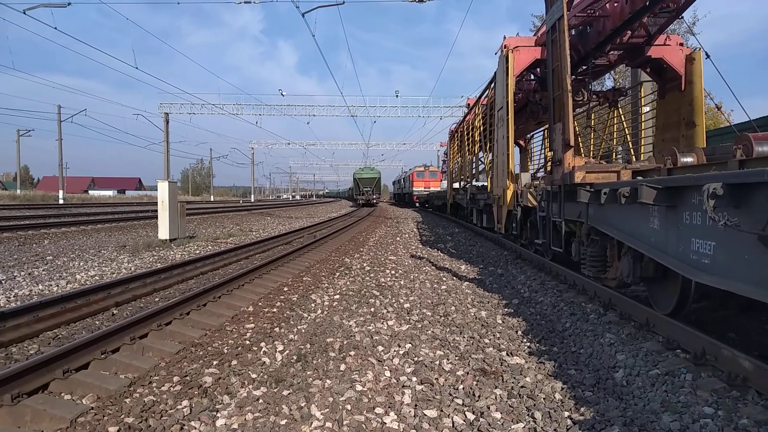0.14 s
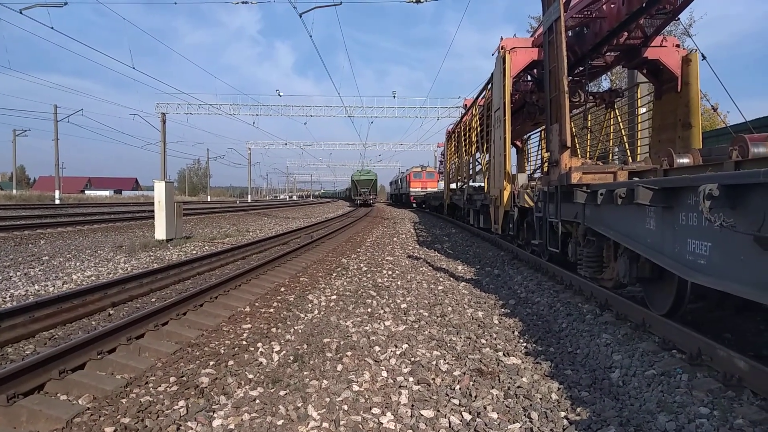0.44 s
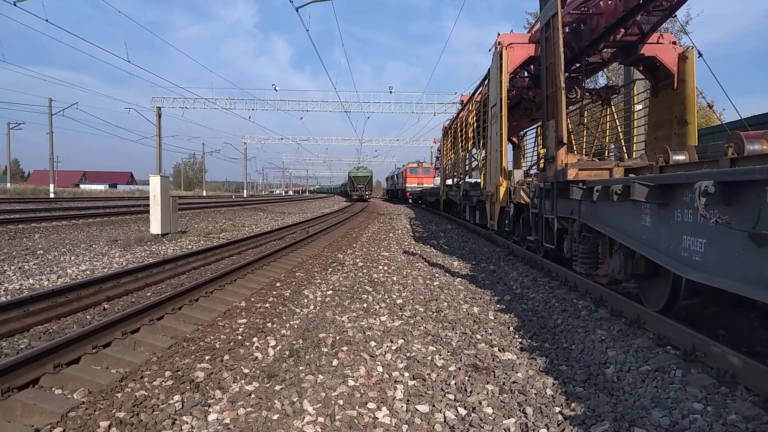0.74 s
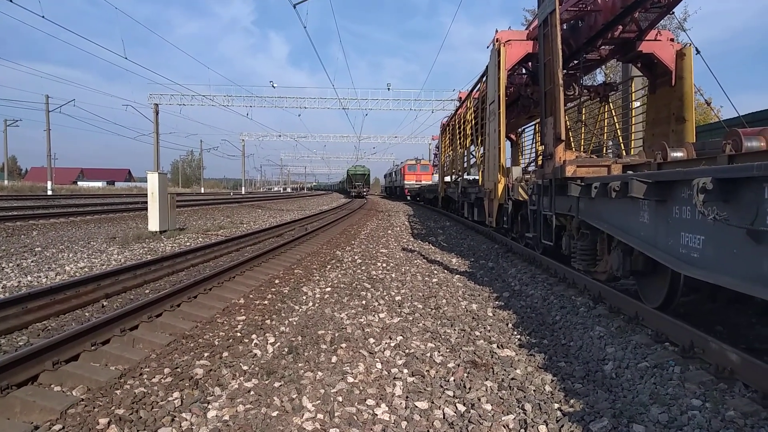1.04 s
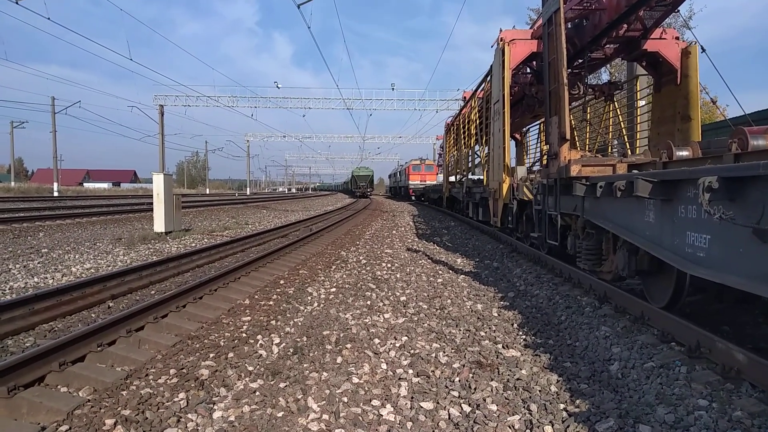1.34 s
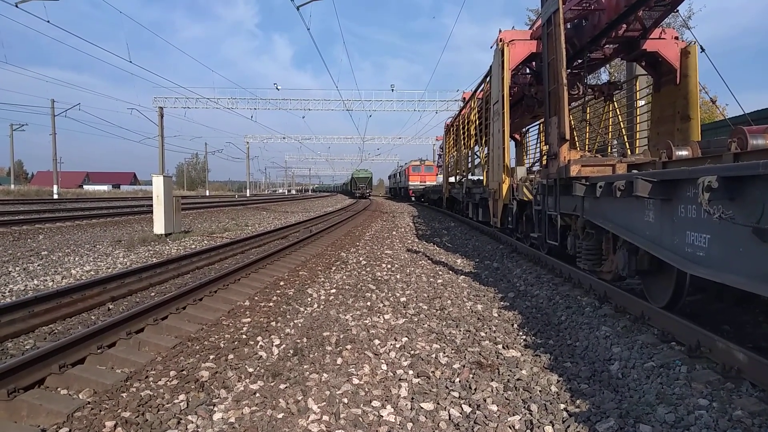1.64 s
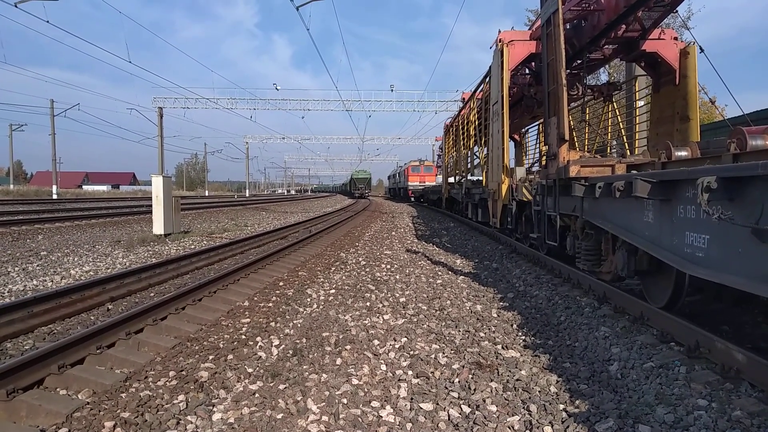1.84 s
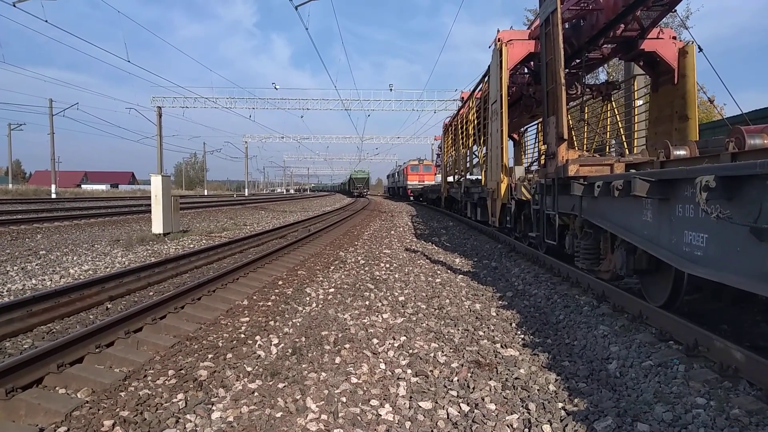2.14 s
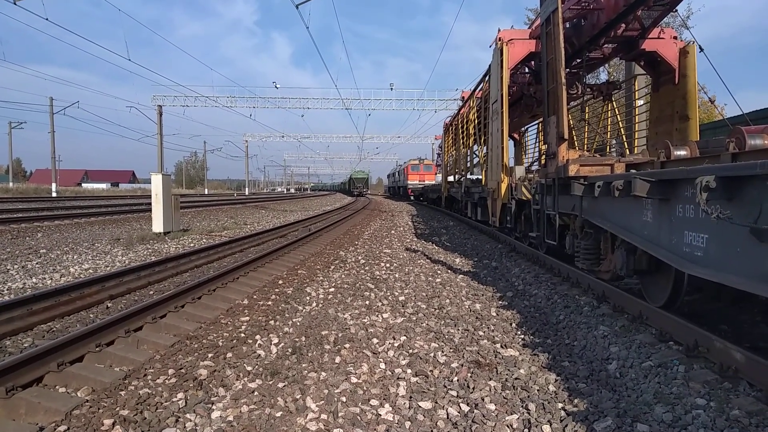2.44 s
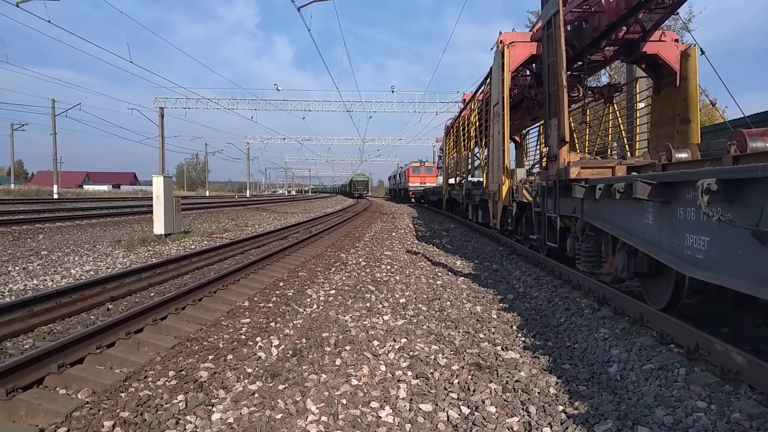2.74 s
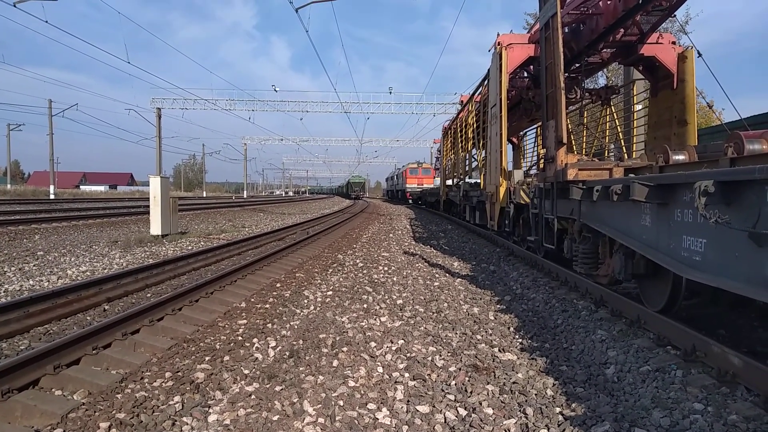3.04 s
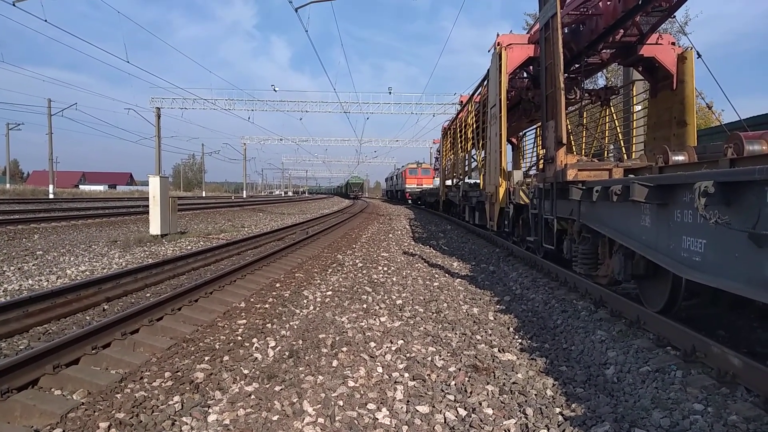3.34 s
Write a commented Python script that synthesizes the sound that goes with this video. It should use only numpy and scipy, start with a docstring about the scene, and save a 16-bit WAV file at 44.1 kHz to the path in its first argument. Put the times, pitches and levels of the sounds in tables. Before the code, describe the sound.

A freight train rolls away, slightly to the right, with rumble, rail hiss and a wheel scraping about five times a second. Loose gear knocks through the first second, with two high pings near 0.3 seconds and a short, loud creak on the left at 0.6. Wheels double-clack over a rail joint at 1.2 and 1.9 seconds. The scraping continues to 3.5 seconds as the rumble fades.

```python
"""A freight train rolls away over ballasted track, to the right of the microphone.
Wagons rumble and rails hiss from the start, and a worn wheel scrapes once a turn. Loose gear knocks,
a flange brushes the rail and rings twice, and a short stick-slip creak comes from the left.
Near 1.2 s and 1.9 s two bogies clatter over a rail joint, two axles each.
The wheel scrapes on while the rumble fades with distance."""
import sys
import numpy as np
from scipy import signal
from scipy.fft import rfft, irfft
from scipy.io import wavfile
from scipy.ndimage import uniform_filter1d

SR = 44100
rng = np.random.default_rng(int(sys.argv[2]) if len(sys.argv) > 2 else 0)


def log_audio(samples):
    """Write samples as a 16-bit WAV file to the path given in sys.argv[1]."""
    # one column per channel
    frames = np.atleast_2d(samples).T
    # limit to full scale, then quantise
    limited = np.clip(frames, -1, 1)
    pcm = np.round(limited * 32767).astype(np.int16)
    wavfile.write(sys.argv[1], SR, pcm)


N = 154350
SIDE = np.array([[.5], [-.5]])  # left, right share of a pan; positive pan_db is left


def undb(db):
    """Decibels to gain."""
    return 10 ** (np.asarray(db) / 20)


def clock():
    """Sample times in s."""
    return np.arange(N) / SR


def unit(x):
    """Scale to rms 1."""
    return x / np.sqrt(np.mean(x ** 2))


def curve(rows, column=1):
    """One table column, interpolated in time."""
    rows = np.array(rows)
    return np.interp(clock(), rows[:, 0], rows[:, column])


def freqs():
    """Bin frequencies in Hz."""
    return np.maximum(np.arange(N // 2 + 1) * SR / N, 1)


def along(points):
    """(freq_hz, value) points, interpolated in log frequency."""
    hz, value = np.array(points).T
    return np.interp(np.log(freqs()), np.log(hz), value)


def shape(points):
    """Gain of a (freq_hz, gain_db) spectrum, rolled off past its ends."""
    low_rolloff = np.minimum(freqs() / points[0][0], 1) ** 2
    high_rolloff = np.minimum(points[-1][0] / freqs(), 1) ** 5
    return undb(along(points)) * low_rolloff * high_rolloff


def resonance(hz, width_hz):
    """One resonance, gain 1 at centre."""
    f = freqs()
    return 1 / (1 + 1j * (f * f - hz * hz) / (f * width_hz))


def walk(hz):
    """Smooth random wander, rms 1."""
    step = int(SR / hz)
    held = np.repeat(rng.standard_normal(N // step + 1), step)
    return unit(uniform_filter1d(held, step)[:N])


def blow(start_s, attack_s, hold_s, decay_s, tail_db=-60, tail_s=.01):
    """Impact envelope: attack, hold, main decay plus a weaker tail."""
    t = clock() - start_s
    late_s = np.maximum(t - attack_s - hold_s, 0)
    share = undb(tail_db)
    fall = (1 - share) * np.exp(-late_s / decay_s) + share * np.exp(-late_s / tail_s)
    return np.clip(t / attack_s, 0, 1) * fall


def struck(sound, envelope):
    """Apply an envelope; the result has the envelope's rms."""
    return unit(sound * envelope) * np.sqrt(np.mean(envelope ** 2))


# Likeness of the two microphone ports: freq_hz, coherence_ratio
PORT_COHERENCE = [(60, 0.89), (400, 0.91), (900, 0.96), (2000, 0.42), (5000, 0.45), (12000, 0.2)]
# Phase between the ports: freq_hz, left_lead_rad
PORT_PHASE = [(100, -1), (400, 0.7), (800, 0.5149), (1550, 5), (1810, 8.5), (3200, 2.5), (4400, 1.07),
              (6100, 3.5), (9000, -3.5)]


def ports(pan):
    """Left and right responses to the shared and the diffuse part of a sound."""
    coherence = np.clip(along(PORT_COHERENCE), 0, 1)
    gain = undb(SIDE * along(pan))
    shared = gain * np.sqrt(coherence) * np.exp(1j * SIDE * along(PORT_PHASE))
    return shared, gain * np.sqrt(1 - coherence)


def linger(decay_s=.012, level_db=-8, corner_hz=1200):
    """Response of the dense, short-lived steel resonances after each impact."""
    tail = rng.standard_normal(N) * np.exp(-clock() / decay_s)
    tail /= np.sqrt(np.sum(tail ** 2))
    return 1 + undb(level_db) * np.minimum(freqs() / corner_hz, 1) * rfft(tail)


def contact(response, mic, grain_db=0, even_s=0.044):
    """Dense tiny impacts ring a body; stereo, levelled to rms 1."""
    shared, diffuse = mic
    force = rfft(rng.standard_normal((3, N)) * undb(grain_db * walk(1500)))
    sound = irfft(response * linger() * (shared * force[0] + diffuse * force[1:]), N)
    window = int(even_s * SR)
    power = uniform_filter1d(np.mean(sound ** 2, axis=0), window)
    return sound / np.sqrt(uniform_filter1d(power, window))


# Wheel modes: freq_hz, gain_db
WHEEL_MODES = [(1692, -21), (2266, 3), (2972, 10), (3637, -19), (4366, -19), (4630, -21), (5470, 15)]


def wheel_ring(mic, width_hz=9):
    """Rail contact rings the wheel's narrow modes."""
    return contact(sum(undb(db) * resonance(hz, width_hz) ** 2 for hz, db in WHEEL_MODES), mic)


# Rolling noise: time_s, rumble_db, hiss_db
ROLL_LEVELS = [(0, -36, -38), (.18, -34, -35.5), (.35, -29, -29), (.43, -34.5, -37.5), (.58, -32, -34),
               (.7, -32.5, -36), (.78, -38.5, -42), (.9, -33.5, -35.5), (1.0, -33, -35.5),
               (1.15, -34, -37.5), (1.4, -35, -33), (1.55, -44.5, -46), (1.75, -40, -42.5),
               (1.89, -40.5, -43.5), (2.15, -41, -43), (2.45, -50, -44.5), (2.8, -45, -45.5),
               (3.5, -53.5, -48)]
# Wagon rumble: freq_hz, gain_db
RUMBLE_SPECTRUM = [(25, -14), (50, -42), (75, -2), (100, 1), (190, 3), (290, -4.5), (380, -6), (590, -11.5),
                   (730, -4.5), (880, -6), (1150, -13.5), (2000, -24.5), (4000, -36.5)]
# Rail hiss, heard with a narrow gap at 3.2 kHz and a steep drop above 8 kHz: freq_hz, gain_db
HISS_SPECTRUM = [(600, -9), (1000, -9.5), (1400, -2), (1720, 6), (2400, 1.5), (3050, 3), (3220, -41),
                 (3450, -2), (3850, -2.5), (4400, 6), (5500, 1), (6400, -10.5), (7800, -8.5), (8400, -45),
                 (10300, -34), (12400, -35), (13500, -76)]
# Wagon body resonances: freq_hz, width_hz, gain_db
WAGON_MODES = [(198, 56, -1), (335, 73, -8), (493, 76, -8), (733, 40, -12), (867, 40, -3.5)]
FLICKER_DB, FLICKER_HZ = 1.5, 60.3


def rolling(mic, sway_db=1, sway_hz=36.37, sing_db=-18, drone_db=-48.5):
    """Wagons rumble, rails hiss and wheels sing, fading with distance; the wagon bodies drone on."""
    rumble = contact(shape(RUMBLE_SPECTRUM), mic)
    rumble *= undb(curve(ROLL_LEVELS, column=1) + sway_db * walk(sway_hz))
    steel = contact(shape(HISS_SPECTRUM), mic, grain_db=1) + undb(sing_db) * wheel_ring(mic)
    steel *= undb(curve(ROLL_LEVELS, column=2) + FLICKER_DB * walk(FLICKER_HZ))
    body = sum(undb(db) * np.abs(resonance(hz, width_hz)) ** 2 for hz, width_hz, db in WAGON_MODES)
    return rumble + steel + undb(drone_db) * contact(body, mic)


# One scrape per turn: peak_s, level_db
WHEEL_TURNS = [(0.104, -29.5), (0.285, -30.5), (0.476, -31), (0.654, -28), (0.857, -28.5), (1.059, -27.5),
               (1.25, -31.5), (1.434, -34), (1.621, -33.5), (1.823, -38.5), (1.996, -32), (2.183, -32.5),
               (2.369, -35.5), (2.561, -28.5), (2.75, -30.5), (2.944, -29.5), (3.129, -31.5),
               (3.316, -33.5), (3.497, -37)]
# Steel scrape, heard with a dip near 3.3 kHz and a steep drop above 8 kHz: freq_hz, gain_db
SCRAPE_SPECTRUM = [(500, -53), (800, -2.5), (1150, -1.5), (1480, -10.5), (1720, 1.5), (2400, -4.5),
                   (3020, -4), (3220, -12.5), (3450, -13), (3850, -6), (4350, 2.5), (5350, 0), (6400, -10),
                   (7800, -17), (8500, -33.5), (10300, -38), (13000, -86)]
# Fine sizzle and bogie shudder: freq_hz, gain_db
SIZZLE_SPECTRUM = [(6000, -30), (8600, 6.5), (10000, 3.5), (12500, 7), (14500, 4.5), (15800, 6)]
SHUDDER_SPECTRUM = [(45, -26), (85, -5), (180, 2), (290, -3), (370, -4), (590, -8), (800, -2), (1050, -15),
                    (1600, -20)]
# Sizzle, lost with distance: time_s, level_db
SIZZLE_LEVELS = [(0, -44), (.1, -43), (.29, -52.5), (.48, -47.5), (.67, -47.5), (.86, -46.5), (1.05, -56),
                 (1.13, -50), (1.18, -76), (1.45, -95)]
TURN_RISE_S, TURN_FALL_S, TURN_ROUND_S = 0.011, 0.039, 0.013
SIZZLE_HALF_WIDTH_S, SIZZLE_FLOOR_DB, SIZZLE_FLICKER_DB = .047, -21.5, 2.5


def worn_wheel(mic, grit_db=-8, shudder_db=-7.5):
    """Once a turn the rough patch scrapes, crushes grit, sizzles and shakes the bogie."""
    scrape_gain, sizzle_gain = 0, undb(SIZZLE_FLOOR_DB)
    for peak_s, level_db in WHEEL_TURNS:
        t = clock() - peak_s
        from_peak_s = np.hypot(t, TURN_ROUND_S) - TURN_ROUND_S
        scrape_gain += undb(level_db) * np.exp(-from_peak_s / np.where(t < 0, TURN_RISE_S, TURN_FALL_S))
        sizzle_gain += np.exp(-(t / SIZZLE_HALF_WIDTH_S) ** 4)
    steel = shape(SCRAPE_SPECTRUM)
    scrape = contact(steel, mic, grain_db=1) + undb(grit_db) * grit(steel, mic)
    scrape *= undb(FLICKER_DB * walk(FLICKER_HZ))
    sizzle = contact(shape(SIZZLE_SPECTRUM), mic, grain_db=2)
    sizzle *= undb(curve(SIZZLE_LEVELS) + SIZZLE_FLICKER_DB * walk(FLICKER_HZ))
    shudder = undb(shudder_db) * contact(shape(SHUDDER_SPECTRUM), mic)
    return scrape_gain * (scrape + shudder) + sizzle_gain * sizzle


def grit(response, mic, grains_per_s=520, spread_db=2.2):
    """Grains of uneven size tick against the wheel; stereo, rms 1."""
    shared, diffuse = mic
    ticks = rng.random(N) < grains_per_s / SR
    sizes = undb(spread_db * np.minimum(rng.exponential(size=N), 2))
    paths = shared * linger() + diffuse * np.array([linger(), -linger()])
    return unit(irfft(rfft(ticks * sizes) * response * paths, N))


# Loose gear: start_s, pitch_hz, level_db, overtone_db, decay_s, pan_db
GEAR_KNOCKS = [(0.21, 192, -26.5, -7, 0.013, 1.5), (.333, 196, -27.5, -2, 0.02, 5),
               (.483, 242, -23.5, -4.5, 0.0082, 5), (0.526, 320, -39.5, 3, 0.012, 22),
               (.842, 926, -27, -25, 0.016, 12), (0.876, 143, -26, -21, 0.03, -1),
               (0.939, 254, -24.5, -6, 0.024, 2.5), (1.140, 1420, -39, -8.5, 0.011, 21)]


def gear_knocks(overtone_ratio=1.81, width_ratio=0.34):
    """Loose gear rattles briefly into a damped resonance and its overtone."""
    out, rattle = 0, rfft(rng.standard_normal(N))
    for start_s, pitch_hz, level_db, overtone_db, decay_s, pan_db in GEAR_KNOCKS:
        hit = blow(start_s, attack_s=0.0039, hold_s=0.0012, decay_s=decay_s)
        low, high = (struck(irfft(rattle * resonance(hz, width_ratio * hz) ** 2, N), hit)
                     for hz in (pitch_hz, pitch_hz * overtone_ratio))
        out += (low + undb(overtone_db) * high) * undb(level_db + pan_db * SIDE)
    return out


# Flange touches: start_s, level_db
FLANGE_PINGS = [(.215, -37.5), (.338, -33)]


def flange_pings(pitch_hz=5500, width_hz=240, pan_db=-11):
    """A flange brushes the rail and one high wheel mode rings."""
    mode = irfft(rfft(rng.standard_normal(N)) * resonance(pitch_hz, width_hz) ** 2, N)
    rings = sum(undb(level_db) * struck(mode, blow(start_s, attack_s=0.015, hold_s=0, decay_s=0.021))
                for start_s, level_db in FLANGE_PINGS)
    return rings * undb(pan_db * SIDE)


# Creak envelope: time_s, level_db
CREAK_LEVELS = [(.554, -53), (.557, -20), (.568, -23), (.572, -10.5), (.587, -19.5), (.590, -12),
                (.595, -48)]


def creak(slip_hz=214.3, jitter=.2, rub_gain=0.09, body_hz=810, width_hz=590, right_db=-20):
    """Uneven stick-slip pulses and rubbing drive one broad resonance."""
    cycles = np.cumsum(slip_hz * np.exp(jitter * walk(300))) / SR
    friction = np.diff(np.floor(cycles), prepend=0) + rub_gain * rng.standard_normal(N)
    body = irfft(rfft(friction) * resonance(body_hz, width_hz) ** 3, N)
    body /= np.sqrt(uniform_filter1d(body ** 2, int(SR / slip_hz)))
    sliding = (clock() > CREAK_LEVELS[0][0]) & (clock() < CREAK_LEVELS[-1][0])
    return struck(body, undb(curve(CREAK_LEVELS)) * sliding) * undb([[0], [right_db]])


# Axles at the joint: start_s, attack_s, ring_build_s, thud_db, clunk_db, clang_db, ring_db, crack_db
AXLE_HITS = [(1.18, 0.0085, 0.0046, -33.5, -20.5, -20, -20, -36),
             (1.3, 0.017, 0.0016, -21.5, -30, -25, -24, -26),
             (1.911, 0.0064, 0.0016, -31, -23.5, -25.5, -23, -25),
             (2.036, 0.011, 0.0082, -34.5, -33, -25, -22, -33)]
# Bogie resonances: freq_hz, gain_db
THUD_SPECTRUM = [(60, -42), (130, -17.5), (195, -6.5), (250, -13), (400, -42)]
CLUNK_SPECTRUM = [(150, -36), (280, -13.5), (365, 0.5), (430, -6), (495, -1), (600, -44)]
CLANG_SPECTRUM = [(450, -40), (620, -2), (735, 0.5), (880, -1), (1100, -28), (1700, -13.5), (3000, -29)]
# Struck wheel and rail, heard with a steep drop above 8 kHz: freq_hz, gain_db
STEEL_SPECTRUM = [(700, -23), (1000, -4.5), (1450, -5.5), (1680, 5.5), (2000, -6), (2550, -5), (2980, -1),
                  (3200, -8.5), (3800, -4), (4350, 5.5), (5000, 0.5), (5550, 1), (6300, -13.5),
                  (7600, -10.5), (8400, -31), (10300, -32.5), (12200, -70), (13500, -80)]
# Port balance for the joint: freq_hz, pan_db
JOINT_PAN = [(100, 2.5), (400, 4), (800, -0.5), (1300, -8.5), (2200, 2), (4500, -3.5), (5800, -11),
             (8000, 4.5), (11000, 1)]


def rail_joint(modes_db=-13.5):
    """Each axle drops in: steel cracks on steel, the bogie thuds and clangs, wheel and rail ring on."""
    mic = ports(JOINT_PAN)
    bogie = [contact(shape(body), mic) for body in (THUD_SPECTRUM, CLUNK_SPECTRUM, CLANG_SPECTRUM)]
    steel = contact(shape(STEEL_SPECTRUM), mic, grain_db=1) + undb(modes_db) * wheel_ring(mic)
    edge = contact(shape(STEEL_SPECTRUM), mic, grain_db=5.5)
    out = 0
    for start_s, attack_s, build_s, *bogie_db, ring_db, crack_db in AXLE_HITS:
        hit = blow(start_s, attack_s, hold_s=0.0099, decay_s=0.0058, tail_db=-9, tail_s=0.076)
        ring = blow(start_s, attack_s + build_s, hold_s=0.01, decay_s=0.042, tail_db=-13, tail_s=0.11)
        crack = blow(start_s + attack_s, attack_s=0.0013, hold_s=0.0043, decay_s=.009)
        out += sum(undb(db) * struck(body, hit) for db, body in zip(bogie_db, bogie))
        out += undb(ring_db) * steel * ring + undb(crack_db) * struck(edge, crack)
    return out


# Port balance for rolling noise and worn wheel: freq_hz, pan_db
TRAIN_PAN = [(60, 0), (200, 1.5), (400, 3.5), (750, 0.5), (1300, -5), (2300, 0.5), (4400, -6), (5800, -13),
             (8000, 6), (11000, 2)]


def scene():
    """The whole train in stereo."""
    mic = ports(TRAIN_PAN)
    return rolling(mic) + worn_wheel(mic) + gear_knocks() + flange_pings() + creak() + rail_joint()


LOW_CUT_HZ, HIGH_CUT_HZ = 31, 15800


def record(dry):
    """The recorder cuts the deepest bass and the top."""
    low_cut = signal.butter(2, LOW_CUT_HZ, "high", fs=SR, output="sos")
    high_cut = signal.ellip(8, .2, 70, HIGH_CUT_HZ, fs=SR, output="sos")
    return signal.sosfilt(high_cut, signal.sosfilt(low_cut, dry))


dry = scene()
out = record(dry)
log_audio(out)
```